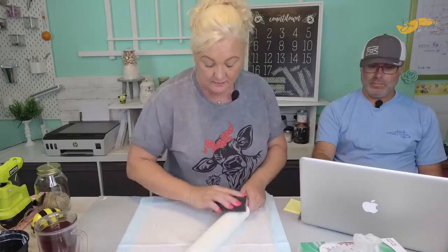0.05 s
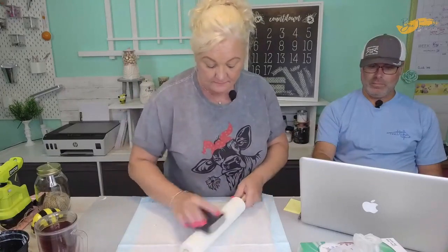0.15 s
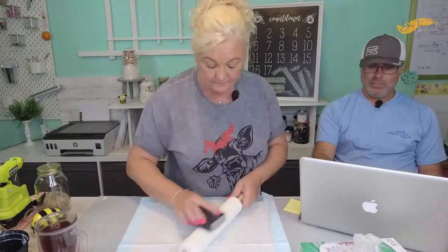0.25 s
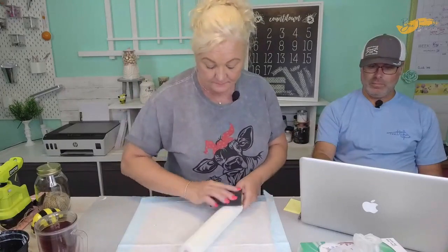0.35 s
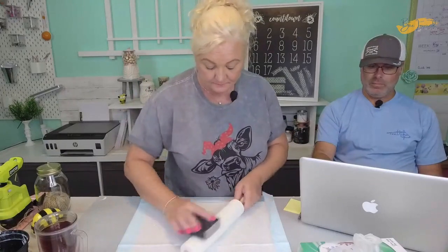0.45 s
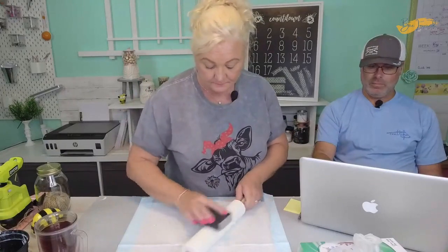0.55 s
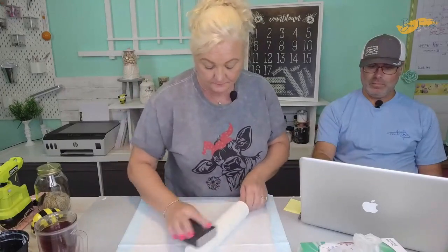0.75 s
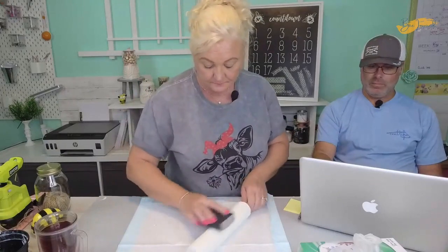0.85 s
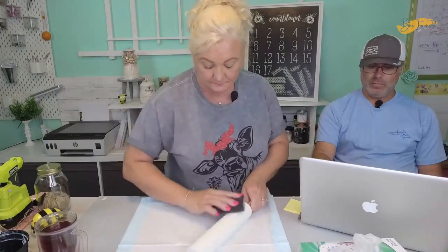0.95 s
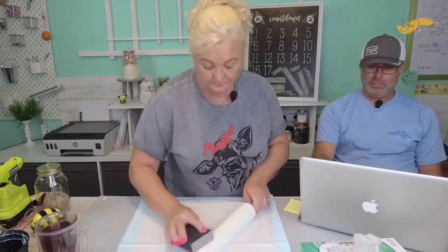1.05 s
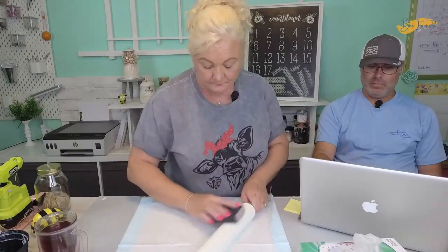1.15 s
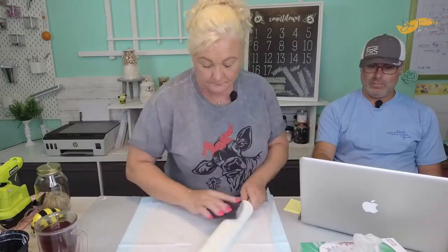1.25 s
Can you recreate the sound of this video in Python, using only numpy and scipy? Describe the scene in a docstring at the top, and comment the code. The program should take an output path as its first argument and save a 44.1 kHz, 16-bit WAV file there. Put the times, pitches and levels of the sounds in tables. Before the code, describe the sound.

Dry, gritty sanding of a painted wooden rolling pin runs throughout, about nine quick strokes in 1.3 seconds, each brighter at its fastest and softer at the turns. A sharp hollow wood knock lands on the table at 0.24 s with a short room tail. Low judders bump at 0.31, 0.53, 0.87 and strongest at 1.02 s. At 0.7 s, a rough brief squeak with fainter knocks. Quiet low rumble underneath; mono.

```python
"""A sanding block rubs to and fro along a painted wooden rolling pin on a craft table.
From the start: grit rasp (random clicks), brighter with stroke speed, over a steady low noise rumble;
judders (wobbling low tones plus scrape noise) come and go to the end. At 0.23-0.31 s the pin knocks the
table (force pulses into wood modes and a short room tail). Near 0.7 s: one squeak (unsteady partials),
with fainter knocks."""
import sys
import numpy as np
from scipy import signal
from scipy.fft import rfft, irfft
from scipy.io import wavfile

SR = 44100
rng = np.random.default_rng(int(sys.argv[2]) if len(sys.argv) > 2 else 0)


def store_pcm(level_fs):
    """Save levels as 16-bit WAV."""
    pcm = np.round(np.clip(level_fs, -1, 1) * 32767).astype(np.int16)
    wavfile.write(sys.argv[1], SR, np.atleast_2d(pcm).T)


N = 57330


def undb(db):
    """Decibels to gain."""
    return 10 ** (np.asarray(db) / 20)


def unit(x):
    """Scale to rms 1."""
    return x / np.sqrt(np.mean(x ** 2))


def colour(x, points):
    """Filter by (f/Hz, level/dB) points, interpolated over log frequency."""
    hz, db = np.array(points, float).T
    f_hz = np.maximum(np.fft.rfftfreq(N, 1 / SR), 1)
    gain = undb(np.interp(np.log(f_hz), np.log(hz), db))
    return irfft(rfft(x) * gain, N)


def bands(x, count):
    """Split into overlapping bands that sum to the whole: (centre Hz, signal)."""
    centres_hz = np.geomspace(150, 16000, count)
    log_f = np.log(np.maximum(np.fft.rfftfreq(N, 1 / SR), 1))
    spectrum = rfft(x)
    split = []
    for hz, corner in zip(centres_hz, np.eye(count)):
        weight = np.interp(log_f, np.log(centres_hz), corner)
        split.append((hz, irfft(spectrum * weight, N)))
    return split


def walk(points_per_s):
    """Random drift: straight lines between random points, rms near 1."""
    position = np.arange(N) / SR * points_per_s
    return 1.2 * np.interp(position, np.arange(N), rng.standard_normal(N))


# block strokes: start t/s, fastest t/s, end t/s, level/dB, treble/dB
STROKE_LIST = [(-.02, 0.063, 0.12, 0.5, -6.5), (0.116, 0.207, 0.29, -3.5, -5.5),
               (0.268, 0.376, 0.41, -6, 3), (0.388, 0.5, 0.572, 0.5, -3.5), (0.562, 0.663, 0.69, -2.5, 1),
               (0.696, 0.756, 0.852, 2.5, -1.5), (0.853, 0.955, 0.997, 0, -1), (0.996, 1.027, 1.17, 1, -1),
               (1.135, 1.192, 1.29, -4.5, 1)]
# relative rasp spectrum at full speed: f/Hz, level/dB
RASP_SPECTRUM = [(200, -3.5), (500, -15), (1000, -6), (1450, -2.5), (1850, -8), (2300, -3), (2650, -3),
                 (3300, 1), (4200, -0.5), (4900, -3), (6200, 0), (8100, -9.5), (9200, -6), (10300, -13.5),
                 (12000, -12), (15500, -18.5)]
RASP_DB, REST_DB, SPEED_EXPONENT = -48.5, -4.5, 0.91  # REST_DB: extra level at standstill
# rise from standstill to full speed: below 3 kHz, from 12 kHz up
SPEED_BASS_DB, SPEED_TREBLE_DB = 1.5, 21.5
GRIT_PER_S, GRIT_SPREAD_DB = 12000, 2
FLICKER_DB, FLICKER_PER_S = 1.9, 60


def rasp(t):
    """Grit catches on the paint; each stroke speeds up and slows down, and treble follows speed."""
    speed, weight, load, bright = np.zeros(N), 0, 0, 0
    for start, fastest, end, db, treble_db in STROKE_LIST:
        # -1 at start, 0 at fastest, 1 at end
        u = (t - fastest) / np.where(t < fastest, fastest - start, end - fastest)
        arc = np.cos(np.pi / 2 * np.clip(u, -1, 1)).clip(0)
        speed = np.maximum(speed, arc ** SPEED_EXPONENT)
        share = 1 / (1 + u ** 16)
        weight = weight + share
        load = load + share * db
        bright = bright + share * treble_db
    load_db, bright_db = load / weight, bright / weight

    caught = rng.random(N) < GRIT_PER_S / SR
    sign = rng.choice([-1, 1], N)
    size_db = GRIT_SPREAD_DB * np.minimum(rng.exponential(size=N), 5)
    grit = caught * sign * undb(size_db)

    out = 0
    for hz, band in bands(unit(colour(travel(grit, t), RASP_SPECTRUM)), count=24):
        high = np.clip(np.log2(hz / 3000) / 2, 0, 1)  # 0 at 3 kHz, 1 at 12 kHz
        swing_db = SPEED_BASS_DB + high * (SPEED_TREBLE_DB - SPEED_BASS_DB)
        flicker_db = FLICKER_DB * walk(FLICKER_PER_S)
        out = out + band * undb(load_db + high * bright_db + swing_db * (speed - 1) + flicker_db)
    rest_gain = 1 + (undb(REST_DB) - 1) * np.exp(-speed / .1)
    return undb(RASP_DB) * out * rest_gain


RIPPLE_DB, RIPPLE_HZ, SPOT_S = 4.5, 119.36, 0.068  # peak spread, peak spacing, time per spot


def travel(x, t):
    """Each contact spot rings with its own narrow peaks; one fades into the next every SPOT_S."""
    f_hz, spectrum, out = np.fft.rfftfreq(N, 1 / SR), rfft(x), 0
    for k, row in enumerate(rng.standard_normal((36, 400))):
        ripple = undb(RIPPLE_DB * np.interp(f_hz / RIPPLE_HZ, np.arange(len(row)), row))
        near = np.sqrt(np.clip(1 - np.abs(t / SPOT_S - k), 0, 1))
        out = out + near * irfft(spectrum * unit(ripple), N)
    return out


# pin on table: t/s, level/dB, contact time/s
KNOCK_LIST = [(0.2306, -27.5, 0.00055), (0.2331, -7, 0.0008), (.2354, -5, 0.002), (.2412, 0.3, 0.0038),
              (0.2648, -21, 0.0014), (0.3121, -23.5, 0.0016), (0.7006, -35, 0.0018), (0.706, -31, 0.00077),
              (0.7116, -20, 0.004), (0.7191, -14.5, 0.0044), (0.741, -23, 0.00417)]
# modes of pin and table: f/Hz, relative level/dB, t60/s
WOOD_MODES = [(116, -32.5, 0.11), (176.4, -4.5, 0.11), (233.2, -14.5, 0.23), (302.8, 5, 0.063),
              (402, -5.5, 0.067), (532, -6.5, 0.073), (575, -8.5, 0.15), (701, -3.5, 0.1),
              (775, 0.5, 0.045), (883, 0, 0.054), (1100, -3.5, 0.076), (1264, -4, 0.042), (1371, -8, 0.069),
              (1560, -10, 0.097)]
# relative spectrum of the diffuse table and room ring: f/Hz, level/dB
TAIL_SPECTRUM = [(40, -7), (80, -10), (120, -4.5), (300, -4), (450, -11), (800, -7), (1300, -15.5),
                 (1900, -11.5), (4000, -37)]
TAIL_DB, TAIL_BUILD_S = -13, 0.011
TAIL_LOW_T60_S, TAIL_HIGH_T60_S = 0.22, 0.26  # at 150 Hz, 1500 Hz


def knocks(t):
    """Each contact pushes the wood for a moment: the longer the push, the duller the knock."""
    force = np.zeros(N)
    for at, db, contact_s in KNOCK_LIST:
        push = np.exp(-((t - at) / (contact_s / np.pi)) ** 2)
        force += undb(db) * push / push.sum()

    wood = 0
    for hz, db, t60_s in WOOD_MODES:
        wood = wood + undb(db) * np.sin(2 * np.pi * hz * t) * undb(-60 * t / t60_s)

    tail = 0
    for hz, band in bands(unit(colour(rng.standard_normal(N), TAIL_SPECTRUM)), count=8):
        t60_s = np.interp(np.log(hz), np.log([150, 1500]), [TAIL_LOW_T60_S, TAIL_HIGH_T60_S])
        tail = tail + band * np.exp(-np.log(1000) * t / t60_s)
    build = 1 - np.exp(-t / TAIL_BUILD_S)
    ring = wood / 2 + undb(TAIL_DB) * tail * build
    return signal.fftconvolve(force, ring)[:N]


# dragging block: peak t/s, rise/s, fall/s, f/Hz, level/dB, scrape level/dB
JUDDER_LIST = [(.005, 0.013, 0.008, 116, -49.5, -78), (0.313, 0.013, 0.017, 110, -33, -57),
               (.465, 0.06, 0.031, 124, -49, -76), (.53, 0.0084, 0.012, 135, -41.5, -52),
               (.56, 0.03, 0.057, 130, -56.5, -60), (.68, 0.021, 0.026, 136, -50.5, -55.5),
               (.868, 0.011, 0.014, 122.2, -41, -79), (.965, 0.014, 0.059, 131, -56.5, -60.5),
               (1.015, 0.0096, 0.02, 117.4, -28, -53.5), (1.26, 0.021, 0.017, 134.5, -56.5, -56.5)]
# relative spectrum of the scrape at each slip: f/Hz, level/dB
SCRAPE_SPECTRUM = [(30, 3), (120, 7), (300, 2.5), (500, -8), (1000, 6), (1450, -6.5), (2000, 1.5),
                   (3500, -10), (8000, -35)]
JUDDER_WOBBLE, JUDDER_OVERTONE_DB = 0.049, -29.5  # wobble: fraction of f


def judders(t):
    """The block sticks and slips for a few cycles, shaking the table and scraping at each slip."""
    out, scrape = 0, unit(colour(rng.standard_normal(N), SCRAPE_SPECTRUM))
    for at, rise_s, fall_s, hz, db, scrape_db in JUDDER_LIST:
        phase = 2 * np.pi * np.cumsum(hz * (1 + JUDDER_WOBBLE * walk(200))) / SR
        swell = np.exp(-((t - at) / np.where(t < at, rise_s, fall_s)) ** 2)
        shake = np.sqrt(2) * (np.sin(phase) + undb(JUDDER_OVERTONE_DB) * np.sin(2 * phase))
        slips = scrape * (1 + .5 * np.sin(phase))
        out = out + swell * (undb(db) * shake + undb(scrape_db) * slips)
    return out


# squeak partials, lowest is a groan: f/Hz, width/Hz, relative level/dB, rise/s, t60/s
SQUEAK_PARTIALS = [(323.2, 22, 3, 0.0093, 0.091), (2212, 70, -0.5, 0.0071, 0.27),
                   (2334, 99, -0.5, 0.017, 0.2), (3135, 28, -10.5, 0.0074, 0.11),
                   (3990, 44, -11, 0.018, 0.1), (4330, 174, -10.5, 0.043, 0.045),
                   (4580, 200, -5, 0.03, 0.069)]
SQUEAK_START_S, SQUEAK_HOLD_S = .699, 0.0075
SQUEAK_ROUGH_DB, SQUEAK_DB = 6, -38.5


def squeak(t):
    """The block bites at a stroke's start; each rough partial builds and dies at its own pace."""
    age, out = t - SQUEAK_START_S, 0
    for hz, width_hz, db, rise_s, t60_s in SQUEAK_PARTIALS:
        fading_s = np.maximum(age - rise_s - SQUEAK_HOLD_S, 0)
        envelope = np.clip(age / rise_s, 0, 1) * np.exp(-np.log(1000) * fading_s / t60_s)
        tone = np.sin(2 * np.pi * np.cumsum(hz + width_hz / 2 * walk(250)) / SR)
        rough_db = SQUEAK_ROUGH_DB * np.clip(walk(350), -1, 1)
        out = out + envelope * undb(db + rough_db) * tone
    return undb(SQUEAK_DB) * out


# relative spectrum of the table rumble: f/Hz, level/dB
RUMBLE_SPECTRUM = [(25, -2.5), (70, -22), (120, -8), (170, -9), (280, -7), (500, -17), (1500, -34.5)]
RUMBLE_DB = -68.5


def rumble():
    """Low table rumble under the rubbing: steady coloured noise."""
    return undb(RUMBLE_DB) * unit(colour(rng.standard_normal(N), RUMBLE_SPECTRUM))


def scene():
    """Sum of all sources, one channel."""
    t = np.arange(N) / SR
    return (rasp(t) + knocks(t) + judders(t) + squeak(t) + rumble())[None]


LOW_CUT_HZ, BASS_LEAK_DB, TOP_HZ = 101, -19.5, 15700


def record(dry):
    """The microphone thins the deep bass, leaking a little past the low cut, and cuts the top."""
    low_cut = signal.butter(4, LOW_CUT_HZ, "high", fs=SR, output="sos")
    thin = signal.sosfilt(low_cut, dry) + undb(BASS_LEAK_DB) * dry
    top_cut = signal.ellip(10, .2, 80, TOP_HZ, fs=SR, output="sos")
    return signal.sosfilt(top_cut, thin)


dry = scene()
out = record(dry)
store_pcm(out)
```